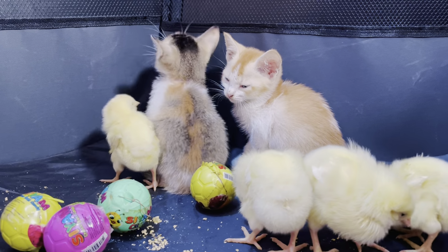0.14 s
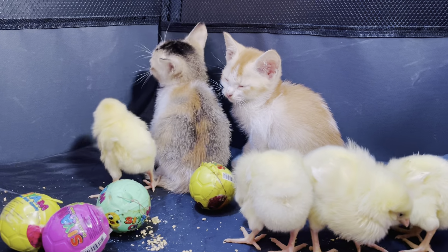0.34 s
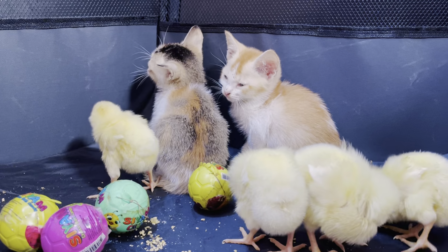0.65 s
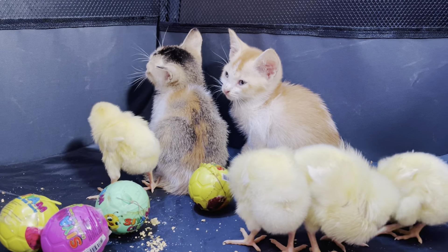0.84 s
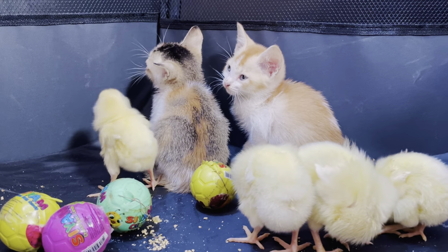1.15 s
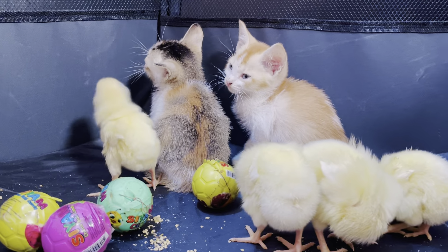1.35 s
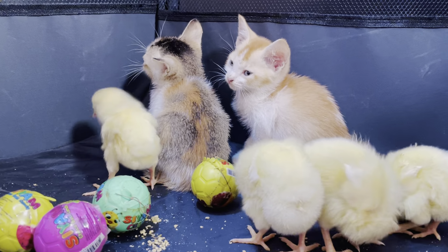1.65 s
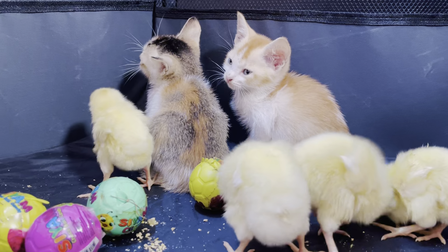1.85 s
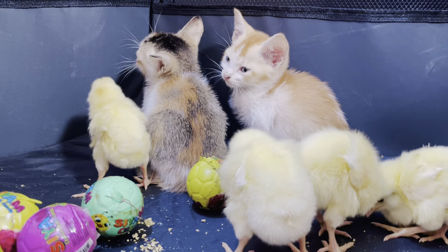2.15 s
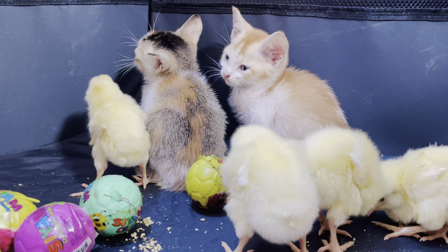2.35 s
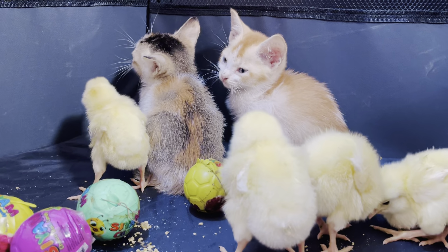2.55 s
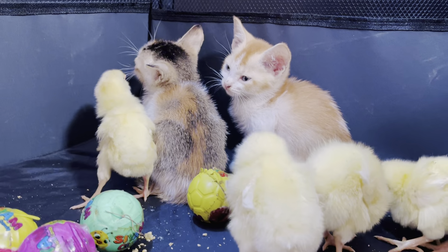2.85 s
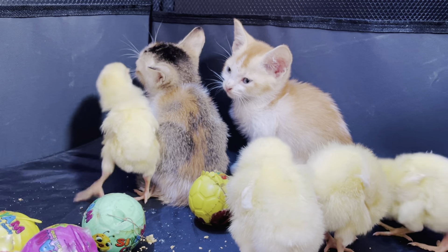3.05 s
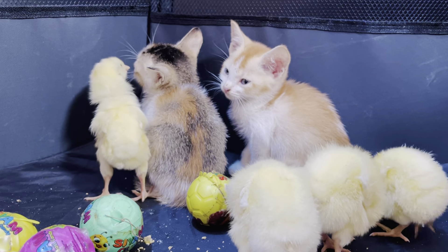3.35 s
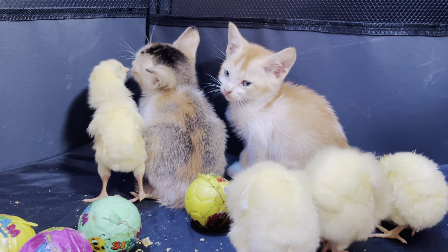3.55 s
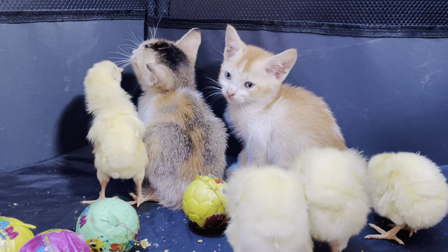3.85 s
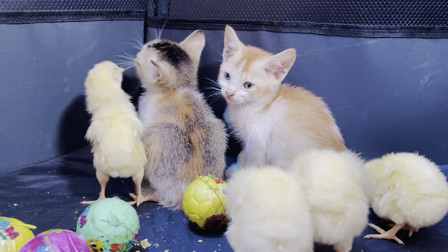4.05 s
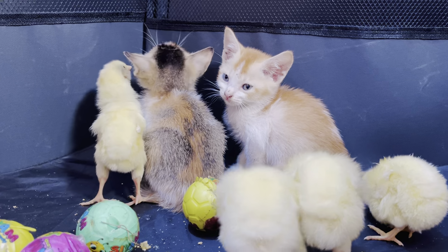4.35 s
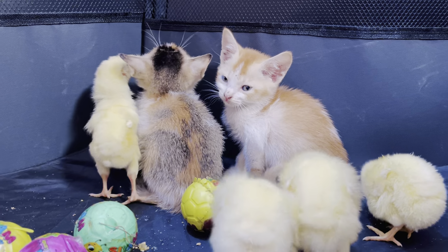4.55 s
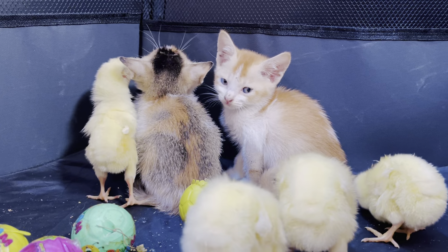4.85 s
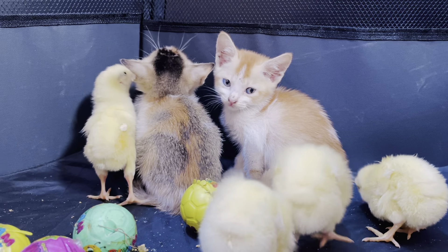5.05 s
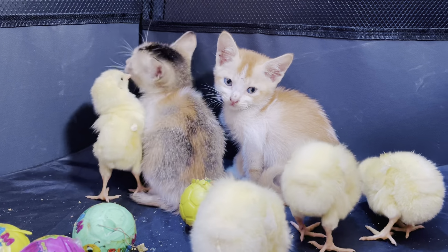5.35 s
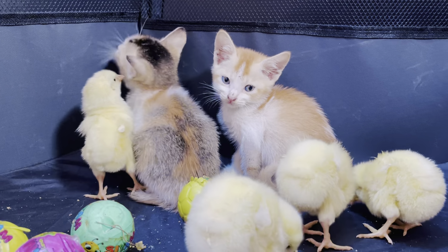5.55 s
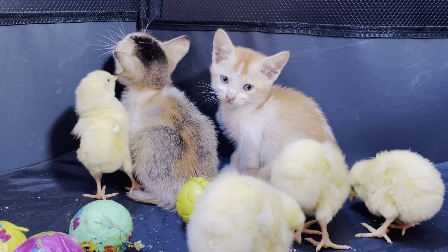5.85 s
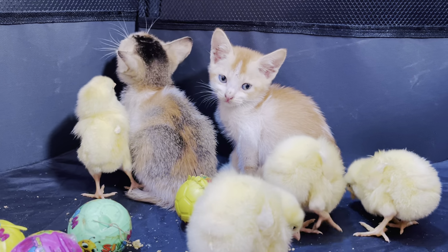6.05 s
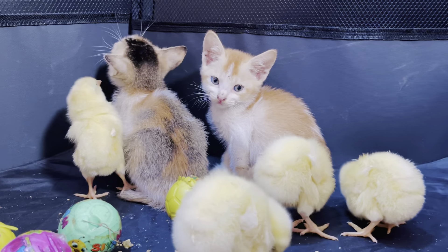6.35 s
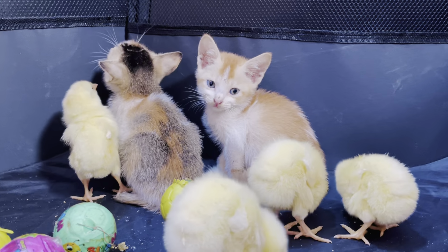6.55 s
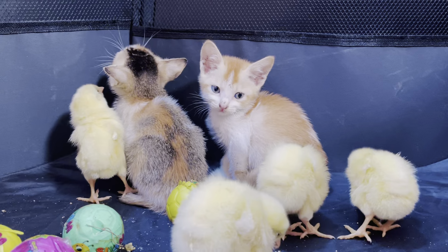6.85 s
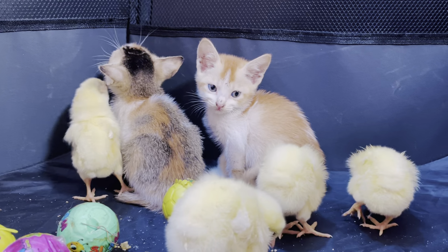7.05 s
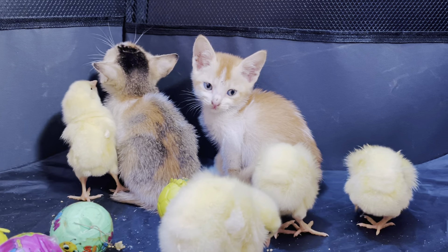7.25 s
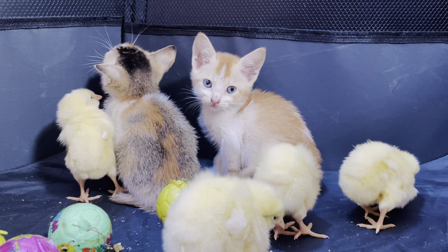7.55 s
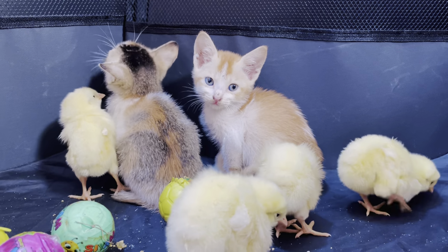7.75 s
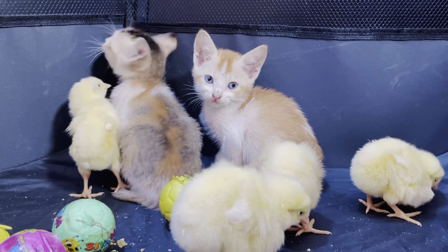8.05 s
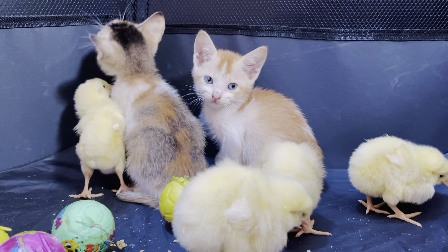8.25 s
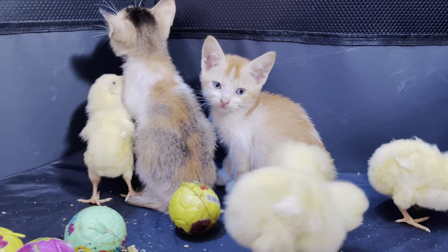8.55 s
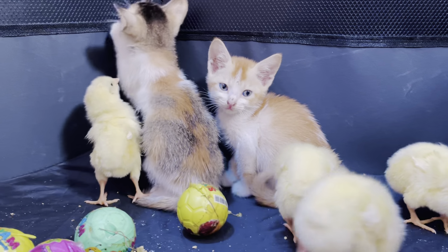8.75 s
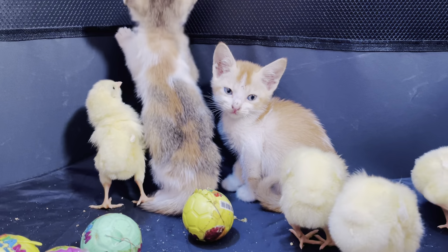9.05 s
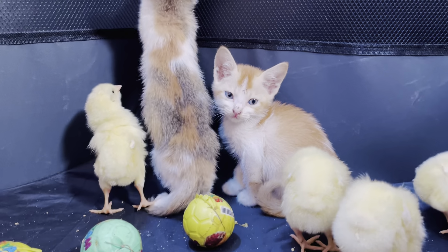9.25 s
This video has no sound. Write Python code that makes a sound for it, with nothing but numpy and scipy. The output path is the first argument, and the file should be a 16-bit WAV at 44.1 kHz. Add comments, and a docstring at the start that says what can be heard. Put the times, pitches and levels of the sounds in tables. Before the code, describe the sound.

Bright chick peeps start at once over scratchy fidgeting, with a low thump of the pen floor early on. The peeping pauses around a clear kitten meow, resumes, then stops for a second, hoarser meow. A third, shorter meow comes among later peeps, followed by louder cheeps and busier claw taps. Close stereo pickup in a small room, brief echo, faint hiss.

```python
"""Chicks and a kitten in a fabric pen

Chicks peep almost throughout in a pet pen in a small room, close to the microphones; a kitten meows three times.
Each peep is a quick arch of a nearly pure whistle; softer trills come from chicks further off.
Each meow is a stack of harmonics that opens hoarse, rings out through the mouth and closes to a thin hum.
Shaped noise makes claws tick, fabric rustle and thud, and air hiss; sparse echoes let the room ring briefly."""
import sys
import numpy as np
from scipy import signal
from scipy.fft import rfft, irfft, next_fast_len
from scipy.io import wavfile
from scipy.ndimage import uniform_filter1d, map_coordinates

SR = 44100
rng = np.random.default_rng(int(sys.argv[2]) if len(sys.argv) > 2 else 0)


def int16_out(signal):
    """Quantize to a 16-bit WAV file."""
    q = np.round(np.clip(np.atleast_2d(signal).T, -1, 1) * 32767)
    wavfile.write(sys.argv[1], SR, q.astype(np.int16))


N = 414981


def gain_of(db):
    """Decibels to amplitude."""
    return 10 ** (np.asarray(db) / 20)


def evened(x):
    """Scales to rms 1."""
    return x / np.sqrt(np.mean(x ** 2) + 1e-20)


def read(points, hz):
    """Reads a curve over frequency, interpolating on a log-frequency axis."""
    f, value = np.transpose(points)
    return np.interp(np.log(hz + 1), np.log(f + 1), value)


def add(mix, start_s, sound):
    """Mixes a sound in at its start, cutting off whatever runs past the end."""
    part = mix[..., max(round(start_s * SR), 0):][..., :sound.shape[-1]]
    part += sound[..., :part.shape[-1]]


def coloured(x, colour):
    """Filters x by a colour in dB over Hz and evens it to rms 1."""
    size = next_fast_len(len(x))
    gain = gain_of(read(colour, np.fft.rfftfreq(size, 1 / SR)))
    return evened(irfft(rfft(x, size) * gain, size)[:len(x)])


def wander(size, hz):
    """Smooth random drift around zero, with hz random points a second."""
    points = rng.standard_normal(4096)
    return map_coordinates(points, [np.arange(size) * hz / SR], order=3, mode="wrap")


def bump(t, at, width):
    """A smooth hump of height 1."""
    return np.exp(-((t - at) / width) ** 2)


def placed(x, left_db):
    """Spreads a sound over two channels, the left one louder by left_db."""
    return x * gain_of([[left_db / 2], [-left_db / 2]])


def movements(rows, fidget_db, rise):
    """Gain over time: each movement swells up (rise = share of its length) and dies away, over fidgeting."""
    # constant fidgeting of the animals, which calms down and picks up again near the end:
    # time_s, level_db (relative to fidget_db)
    fidget = [(0, 1.5), (4, -2.5), (5.5, -8), (7.4, -15), (9.4, -4.5)]
    time = np.arange(N) / SR
    power = gain_of(fidget_db + np.interp(time, *np.transpose(fidget))) ** 2
    for peak_s, length_s, level_db in rows:
        away = np.maximum(time - peak_s, (peak_s - time) / rise) / length_s
        power += gain_of(level_db) ** 2 * np.exp(-np.minimum(2 * away, 20))
    return np.sqrt(power)


def shuffle(rub_db=1.5, scratch_db=-2, grains_per_s=900, grain_db=0.0, clump_db=6.5, lump_db=9.0,
            smooth=0.079):
    """Soft lumpy noise of rubbed fabric, with clumps of tiny crackles where claws catch the weave."""
    # feet and fur rubbing over the fabric: peak_s, length_s (fall to 1/e), level_db (before rub_db)
    rubs = [(.16, 0.18, -69), (.52, 0.039, -67.5), (.68, 0.095, -60.5), (1.25, .2, -66), (1.64, .13, -53),
            (2.05, 0.029, -62), (2.36, 0.093, -63.5), (2.9, 0.073, -59.5), (3.62, 0.096, -60.5),
            (4.12, 0.054, -68.5), (4.36, 0.026, -58.5), (4.66, .15, -69.5), (5.12, 0.046, -66),
            (5.35, 0.024, -63), (6.38, 0.13, -62.5), (6.6, 0.17, -65), (8.23, 0.15, -62.5),
            (8.7, 0.29, -78)]
    # claws catching the weave: peak_s, length_s (fall to 1/e), level_db (before scratch_db)
    scratches = [(.04, 0.017, -49), (.28, 0.04, -55), (.62, .12, -60), (.87, 0.077, -61.5),
                 (1.55, 0.29, -66), (1.82, 0.085, -53), (2.0, 0.03, -46.5), (2.87, 0.055, -73),
                 (3.15, .2, -64.5), (4.56, 0.033, -54), (5.08, 0.11, -62), (6.25, .15, -58.5),
                 (6.7, .2, -71), (7.55, .03, -72), (8.1, .25, -60.5), (8.75, 0.16, -66)]
    # tone of the rubbed fabric: frequency_hz, relative_db
    rub_colour = [(60, -15), (170, 3.5), (400, -0.5), (900, -5.5), (1500, -9.5), (2200, -15), (4000, -9),
                  (7000, -31), (11000, -40)]
    # tone of the caught weave: frequency_hz, relative_db
    scratch_colour = [(2000, -15), (5000, -20.5), (7500, -4.5), (10000, 0.5), (12000, -3), (13500, -7.5),
                      (16000, -20.5)]
    lumps = evened(gain_of(lump_db * np.tanh(wander(N, 45))))
    rubbing = coloured(rng.standard_normal(N), rub_colour) * lumps
    grains = (rng.random(N) < grains_per_s / SR) * rng.standard_normal(N)
    grains = grains * gain_of(grain_db * np.minimum(rng.exponential(1, N), 4))
    clumps = gain_of(clump_db * wander(N, 50))
    crackle = coloured((grains + smooth * rng.standard_normal(N)) * clumps, scratch_colour)
    rubbing = rubbing * movements(rubs, fidget_db=-74.5, rise=1.0)
    crackle = crackle * movements(scratches, fidget_db=-77, rise=0.9)
    return gain_of(rub_db) * rubbing + gain_of(scratch_db) * crackle


def thuds(lump_db=4.0):
    """The floor and walls of the pen flex with a low, lumpy rumble."""
    # the pen flexing under the animals: peak_s, length_s (fall to 1/e), level_db
    flexes = [(.18, .08, -78), (.5, 0.038, -57), (1.66, 0.062, -44), (2.35, 0.045, -54.5),
              (2.87, 0.11, -55), (3.09, .025, -52), (3.65, 0.11, -63), (6.17, .06, -50), (6.6, .18, -61.5),
              (8.52, 0.078, -60.5), (9.26, 0.13, -57.5)]
    # tone of the flexing pen: frequency_hz, relative_db
    thud_colour = [(15, -15), (35, -9.5), (62, 7.5), (120, -4), (200, -17.5), (400, -40)]
    lumps = evened(gain_of(lump_db * np.tanh(wander(N, 22))))
    rumble = coloured(rng.standard_normal(N), thud_colour) * lumps
    return rumble * movements(flexes, fidget_db=-67, rise=.6)


def air(level_db=-68.5, apart=0.5):
    """Faint steady hiss of the room and the microphone: noise mostly shared by both ports."""
    # tone of the hiss: frequency_hz, relative_db (per Hz)
    air_colour = [(20, -17), (250, -6.5), (700, -17.5), (1200, -5.5), (1430, 3.5), (1800, -22.5),
                  (2700, -16.5), (3500, -9), (5000, -11.5), (7600, -32), (9000, 1), (10100, -11.5),
                  (10900, -14), (12800, -21.5), (15500, -36.5)]
    shared, left, right = (coloured(rng.standard_normal(N), air_colour) for _ in range(3))
    return gain_of(level_db) * placed(shared + apart * np.array([left, right]), left_db=3)


def whistle(hz, level_db, overtone_db, quiver, quiver_hz, attack, flutter_db=2.5, third_db=-7,
            release=0.0033):
    """A chick's nearly pure tone with faint overtones, quivering in pitch and level."""
    size = len(hz)
    t = np.arange(size) / SR
    angle = 2 * np.pi * np.cumsum(hz * (1 + quiver * wander(size, quiver_hz))) / SR
    edges = np.clip(np.minimum(t / attack, (t[-1] - t) / release), 0, 1)
    gate = np.sin(np.pi / 2 * edges) ** 2
    overtones = np.sin(2 * angle) + gain_of(third_db) * np.sin(3 * angle)
    tone = np.sin(angle) + gain_of(overtone_db) * overtones
    return np.sqrt(2) * tone * gate * gain_of(level_db + flutter_db * wander(size, 103.5))


def peep(row):
    """A whistle that scoops up to its crest, holds and drops, swelling in the middle."""
    # high, thin peeps carry more overtone than low ones: pitch_hz, overtone_db (relative to the fundamental)
    overtone = [(3400, -28), (4600, -29.5), (4950, -25.5), (5250, -11.5)]
    scoop, scoop_s = .2, 0.016  # share of the pitch it starts under its top; less for a rise near scoop_s
    rise_bend, fall_bend = 2.6, 2.8  # the later the crest, the longer the pitch holds before a steep drop
    ceiling_hz, ceiling_bend = 5095, 1.1  # above this pitch the arch flattens: extra bend per 100 Hz
    lowest_hz = 2850  # the drop aims no lower
    warble_share, warble_hz, warble_from_s = .011, 60.34, 0.11  # only longer peeps waver in pitch
    swell_db, loudest = 5, 0.61  # loss half a length away from the loudest point; its place (0-1)
    beak_hz, beak_db = 4100, 12  # the beak carries this pitch best; loss per squared octave away

    start_s, length_s, top_hz, crest, drop, level_db, left_db = row
    stage, crest = np.linspace(0, 1, int(length_s * SR)), np.clip(crest, .02, .95)
    flat = ceiling_bend * max(top_hz - ceiling_hz, 0) / 100
    depth = scoop * (1 - np.exp(-crest * length_s / scoop_s))
    rise = depth * np.clip(1 - stage / crest, 0, 1) ** (rise_bend + flat)
    fall = np.clip((stage - crest) / (1 - crest), 0, 1) ** (1 + fall_bend * crest + flat)
    fall = min(drop, 1 - lowest_hz / top_hz) * fall
    drawn_out = np.clip(2 * (length_s / warble_from_s - 1), 0, 1)
    warble = warble_share * drawn_out * wander(len(stage), warble_hz)
    hz = top_hz * (1 - rise - fall + warble)
    level_db = level_db - swell_db * (2 * (stage - loudest)) ** 2
    level_db = level_db - beak_db * np.log2(hz / beak_hz) ** 2
    tone = whistle(hz, level_db, read(overtone, hz), quiver=0.007, quiver_hz=89.8, attack=0.0067)
    return start_s, placed(tone, left_db)


def claws(tick_db=-3, knock_db=-4, tick_decay=0.0037, knock_decay=0.023, scrape=0.22,
          scrape_decay=0.049, brush=.12, brush_rise=.008):
    """A foot brushes the floor, lands with a tick and a dull knock, and scrapes on."""
    # claws, beaks and feet on the floor: contact_s, level_db (before tick_db and knock_db),
    # body_db (extra level of the knock)
    ticks = [(0.1376, -50.5, 3.5), (0.496, -61, 13), (0.5669, -46, 0.5), (1.6153, -61, 12),
             (1.7886, -39.5, -25), (1.831, -70, -13), (1.8582, -46, -35), (2.2993, -68, 12.5),
             (3.0084, -52.5, 1.5), (3.4563, -50.5, -19), (4.4554, -47, -4.5), (4.5251, -46, -28),
             (4.9312, -48.5, -11.5), (5.045, -65, -14.5), (5.2656, -49, 0), (6.564, -76, 4),
             (7.302, -51.5, -36), (7.3906, -46, -14), (8.4227, -45, -5.5), (8.5596, -47, -14),
             (8.6762, -40.5, -24), (8.737, -48, -17), (8.8514, -47.5, -17), (9.3228, -47, -10)]
    # tone of the tick: frequency_hz, relative_db
    tick_colour = [(1500, -19), (3000, -8.5), (6000, -14.5), (9000, -6), (12000, -4.5), (14000, -12),
                   (16000, -17)]
    # tone of the knock: frequency_hz, relative_db
    knock_colour = [(50, -17.5), (160, -15.5), (500, -6.5), (1300, -6), (3000, -19.5), (6000, -30)]
    out, t = np.zeros(N), np.arange(-1024, 4096) / SR  # contact at t = 0
    brushing = brush * np.exp(-abs(t) / brush_rise)
    landing = np.exp(-abs(t) / tick_decay) + scrape * np.exp(-abs(t) / scrape_decay)
    contact = np.where(t < 0, brushing, landing)
    thump = np.exp(-abs(t) / knock_decay) * np.clip(t / 0.0017, 0, 1)
    for contact_s, level_db, body_db in ticks:
        tick = coloured(rng.standard_normal(len(t)), tick_colour) * contact
        knock = coloured(rng.standard_normal(len(t)), knock_colour) * thump
        step = gain_of(tick_db) * tick + gain_of(knock_db + body_db) * knock
        add(out, contact_s + t[0], gain_of(level_db) * step)
    return out


def trill(row, droop=0.055):
    """A chick further off: a shallow, strongly warbled arch of whistle."""
    start_s, length_s, pitch_hz, level_db = row
    arch = 1 - droop * np.linspace(-1, 1, int(length_s * SR)) ** 4
    tone = whistle(pitch_hz * arch, level_db, overtone_db=-16, quiver=0.0253, quiver_hz=163, attack=0.0049)
    return start_s, tone


def meow(row, width_hz=420, skirt=1.27, jitter=0.026, jitter_hz=420, shimmer=.5, rasp=1.0, rasp_hz=450,
         waver=0.006, uneven_db=4.5, hoarse_db=-22, airy_db=-58):
    """Vocal-fold harmonics pass a mouth resonance that moves with the jaw, from hoarse push to frayed end."""
    # treble of the wide open mouth: frequency_hz, relative_db
    meow_treble = [(4500, -31.5), (6200, -6), (7200, -4), (8000, -1.5), (9300, -10.5), (11000, -14.5),
                   (12800, -11), (14200, -17.5), (15000, -48)]
    # hoarse noise between the harmonics: frequency_hz, relative_db
    hoarse = [(80, -14), (250, -8), (650, -4), (1500, 0.5), (3000, 5.5), (5000, -0.5), (7000, -9.5),
              (9000, -27), (14000, -19)]
    # a soft voice keeps only its low harmonics clear: mouth_db, clear_hz (above it they turn to noise)
    clear_up_to = [(-67, 4100), (-44.5, 2800), (-31, 29000)]
    push_s, push_width_s, push_db = 0.064, 0.048, 8.5  # hoarse push at the start lifts the fundamental
    open_s, open_width_s, open_db = 0.3, 0.16, 15  # the open mouth thins the fundamental
    lips_s, lips_width_s = 0.026, 0.045  # the parting lips briefly lift the octave
    octave_follows, full_cry_db = 0.43, -16  # share of the cry's dB changes; cry at the listed octave level
    third_db = -14.5  # third harmonic relative to the octave
    treble_db_per_octave, wide_hz = 10, 4690  # treble dulls as the resonance sinks below wide_hz
    clear_rough, fray_s, shut_s = .1, 0.18, 0.076  # mid-call roughness; fray and mouth closing at the end

    curve, hum_db, full_octave_db, lips_db, bright_db, start_rough, end_rough = row
    s, *columns = np.transpose(curve)
    t = np.arange(s[0] - .006, s[-1] + .008, 1 / SR)
    hz, mouth_db, mouth_hz = (uniform_filter1d(np.interp(t, s, c), size=500, mode="nearest")
                              for c in columns)
    age, remaining, size = t - t[0], t[-1] - t, len(t)

    push = bump(age, push_s, push_width_s)
    fray = end_rough * bump(remaining, 0, fray_s)
    opened = bump(age, open_s, open_width_s) * (1 - bump(remaining, 0, shut_s))
    rough = np.clip(clear_rough + start_rough * push + fray, 0, 1)
    first_db = hum_db + push_db * push - open_db * opened
    octave_db = full_octave_db + octave_follows * (mouth_db - full_cry_db)
    octave_db = octave_db + lips_db * bump(age, lips_s, lips_width_s)
    treble_db = mouth_db + bright_db + treble_db_per_octave * np.log2(mouth_hz / wide_hz)

    hz = hz * (1 + jitter * np.minimum(rough, .5) * wander(size, jitter_hz) + waver * wander(size, 60.65))
    angle = 2 * np.pi * np.cumsum(hz) / SR
    order = np.arange(1, 23)[:, None]
    # the two lowest harmonics pass even a closed mouth; the rest share the resonance and the treble
    mouth = (order > 2) * (1 + ((order * hz - mouth_hz) / width_hz) ** 2) ** (-skirt / 2)
    mouth = mouth / (1 + (order * hz / 7500) ** 8)
    treble = gain_of(read(meow_treble, order * hz))
    resonant = gain_of(mouth_db) * mouth / np.linalg.norm(mouth, axis=0)
    bright = gain_of(treble_db) * treble / np.linalg.norm(treble, axis=0)
    height = np.hypot(resonant, bright)
    height[:2] = gain_of([first_db, octave_db])
    height[2] = np.hypot(height[2], gain_of(octave_db + third_db))

    voice, clear_hz = np.zeros(size), np.interp(mouth_db, *np.transpose(clear_up_to))
    for k, partial in enumerate(height, 1):
        # higher harmonics turn to noise first
        smear = np.clip(rasp * rough * (k / 4) ** 1.3 + (k * hz / clear_hz) ** 3, 0, 1)
        noise = (wander(size, rasp_hz) + 1j * wander(size, rasp_hz)) / np.sqrt(2)
        swell = gain_of(uneven_db * min(k / 8, 1) * wander(size, 35))
        carrier = np.exp(1j * (k * angle + 2 * np.pi * rng.random()))
        voice += swell * partial * ((np.sqrt(1 - smear ** 2) + smear * noise) * carrier).real
    voice *= 1 + shimmer * np.minimum(rough, .5) * wander(size, 250)
    breath = gain_of(hoarse_db + mouth_db) * (0.32 + 2 * rough) + gain_of(airy_db) * fray
    voice += coloured(rng.standard_normal(size), hoarse) * breath
    return s[0], np.sqrt(2) * voice * np.clip(np.minimum(age / 0.022, remaining / 0.0067), 0, 1)


def room(x, early_decay=.007):
    """Two echoes of x: quick reflections from the pen, and the short tail of the room."""
    # time for the tail to fall by 60 dB: frequency_hz, decay_s
    room_t60 = [(200, 0.09), (1000, 0.48), (4500, 0.34), (8000, 0.072), (14000, 0.036)]
    t = np.arange(SR // 2) / SR
    # sparse echoes of random sign, different at each port
    taps = rng.standard_normal((2, len(t))) * (rng.random((2, len(t))) < .1) * (t > .006)
    hz, frames, z = signal.stft(taps, SR, nperseg=256)
    decay = gain_of(-60 * frames / read(room_t60, hz)[:, None])
    tail = signal.istft(z * decay, SR, nperseg=256)[1][:, :len(t)]
    early = rng.standard_normal((2, len(t))) * (rng.random((2, len(t))) < .04)
    early = early * (t > .001) * np.exp(-t / early_decay)
    return [signal.fftconvolve(x, h / np.linalg.norm(h, axis=1, keepdims=True), axes=1)[:, :N]
            for h in (early, tail)]


def scene(chicks_db=3, kitten_db=-1, trills_db=-4, early_db=-11, tail_db=-14, far_direct_db=-6,
          feet_echo_db=4):
    """Chicks, kitten and feet in the pen, mostly a little to the left; the far chicks are mostly echo."""
    # near chicks: start_s, length_s, top_hz, crest (place 0-1), drop (share of the pitch),
    # level_db (before chicks_db and the peep's shaping), left_db (left over right)
    peeps = [(0.088, 0.11, 5330, 0.45, 0.11, -44, 2.5), (0.14, 0.041, 3516, 0.15, 0.13, -45.5, 5),
             (0.321, 0.05, 3630, 0.36, 0.17, -49.5, 1), (0.705, 0.24, 5166, 0.59, 0.023, -48.5, 4.5),
             (0.826, 0.049, 3412, 0.25, 0.12, -45.5, 6.5), (0.999, 0.11, 5407, 0.39, 0.16, -45, 6.5),
             (1.014, 0.063, 3440, 0.35, 0.094, -57, 10.5), (1.121, 0.062, 4670, 0.35, 0.21, -47.5, 4),
             (1.536, 0.054, 3763, 0.02, 0.045, -44, 4), (1.629, 0.23, 4740, 0.47, 0.042, -49.5, 5),
             (1.902, 0.12, 4446, 0.27, 0.17, -48.5, 3.0), (1.907, 0.13, 5300, 0.45, 0.11, -47.5, -2.5),
             (2.055, 0.048, 3504, 0.25, 0.13, -48.5, 3), (2.115, 0.1, 5430, 0.46, 0.36, -48, -3),
             (2.205, 0.052, 3575, 0.25, 0.09, -46.5, -0.5), (2.34, 0.085, 4230, 0.18, 0.26, -50, 4.0),
             (2.48, 0.055, 3864, 0.14, 0.12, -48.5, 1.5), (2.485, 0.055, 4540, 0.08, 0.14, -57, 2),
             (2.644, 0.14, 4563, 0.12, 0.23, -42, 6), (2.932, 0.27, 4005, 0.15, 0.095, -50, 0),
             (2.963, 0.15, 5005, 0.62, 0.17, -55, 4), (3.186, 0.13, 4930, 0.4, 0.37, -46.5, 5.5),
             (3.198, 0.096, 5253, 0, 0.07, -50.5, 6), (3.385, 0.12, 5033, 0.47, 0.42, -42.5, 5.5),
             (4.045, 0.16, 4086, 0.34, 0.15, -50.5, 3.5), (4.107, 0.095, 4564, 0.46, 0.041, -53, 5),
             (4.284, 0.079, 4430, 0.38, 0.25, -45, 4.5), (4.46, 0.06, 4230, 0.45, 0.29, -42.5, 4),
             (4.625, 0.047, 3620, 0.34, 0.12, -53.5, -1.5), (4.936, 0.16, 4215, 0.81, 0.23, -43.5, 3.0),
             (5.151, 0.059, 4860, 0.46, 0.46, -42.0, 4.5), (5.269, 0.033, 4450, 0.69, 0.56, -40, 5.0),
             (5.278, 0.11, 5260, 0.44, 0.16, -51.5, 4), (6.539, 0.049, 3520.0, 0.15, 0.16, -50, -1),
             (6.682, 0.164, 4075, 0.07, 0.054, -52, 6.5), (6.915, 0.11, 5154, 0.31, 0.31, -46, 2),
             (6.916, 0.033, 3290, 0.13, 0.13, -53, 2), (7.043, 0.06, 3620, 0.37, 0.12, -46.5, 4.5),
             (7.185, 0.078, 4160, 0.44, 0.19, -47, 5.5), (7.33, 0.077, 4590, 0.3, 0.29, -45.5, 3.0),
             (7.618, 0.072, 4640, 0.28, 0.16, -45.5, 6.5), (7.659, 0.1, 4055, 0, 0.11, -42.5, 8.5),
             (7.986, 0.075, 4160, 0.53, 0.11, -50, -1.0), (8.112, 0.12, 4680, 0.36, 0.35, -45, 5.5),
             (8.289, 0.097, 4930, 0.44, 0.44, -44, 5), (8.631, 0.12, 4120, 0.05, 0.14, -55, 10.5),
             (8.687, 0.055, 3560, 0.15, 0.1, -50.5, 10), (8.744, 0.16, 4630, 0.42, 0.28, -40.5, 4.5),
             (8.862, 0.095, 4350, 0.55, 0.23, -45, 4.0), (8.946, 0.102, 4740, 0.45, 0.36, -40, 3.5),
             (9.056, 0.123, 5095, 0.32, 0.3, -49, 8.5), (9.102, 0.07, 4810, 0.41, 0.39, -39.5, 4.5),
             (9.282, 0.043, 4440.0, 0.29, 0.079, -48.0, 4)]
    # chicks further off: start_s, length_s, pitch_hz, level_db (before trills_db and far_direct_db)
    trills = [(0.465, 0.057, 4270, -64.5), (1.409, 0.16, 4670, -65), (2.68, 0.021, 5030, -65),
              (2.924, 0.25, 4810, -57.5), (4.217, 0.1, 4800, -64), (4.306, 0.063, 5080, -51),
              (4.444, 0.14, 4890, -61), (5.021, 0.091, 4720, -53.5), (5.219, 0.092, 4960, -64),
              (5.394, 0.067, 5050, -55), (6.613, 0.068, 4830, -54), (6.674, 0.1, 4355, -55.5)]
    # one curve a meow: time_s, pitch_hz, mouth_db (strength of the cry, before kitten_db),
    # mouth_hz (resonance)
    MEOW_1 = [(3.538, 543, -61.5, 3960), (3.57, 498.5, -59.5, 3860), (3.6, 635, -33, 3940),
              (3.635, 763, -20, 4920), (3.668, 812.6, -17.5, 5000), (3.735, 800.6, -32.5, 4840),
              (3.78, 763, -40.5, 3330), (3.89, 869, -66.5, 2900), (3.98, 768, -74, 2893),
              (4.12, 500, -83.5, 3000)]
    MEOW_2 = [(5.475, 606, -63, 4400), (5.506, 656, -43, 4280), (5.556, 829.5, -24, 5050),
              (5.608, 884, -27.5, 4530), (5.694, 850.4, -31, 3120), (5.757, 899, -41, 2550),
              (5.81, 937, -53.5, 2880), (5.87, 869, -53, 2820), (5.928, 953, -67.5, 2750),
              (6.131, 876, -66.5, 2950), (6.238, 759, -64.5, 3000), (6.275, 561.3, -58, 3000),
              (6.325, 741, -75, 3000)]
    MEOW_3 = [(7.731, 594, -80, 3000), (7.774, 569, -50.5, 2800), (7.809, 724, -33.5, 2870),
              (7.858, 813, -30, 3660), (7.914, 948, -30.5, 3670), (7.948, 884, -33, 3200),
              (7.985, 907, -33.5, 2580), (8.01, 915, -52, 2700), (8.056, 884, -52, 3160),
              (8.07, 672, -55, 3166)]
    # the meows: curve, hum_db (fundamental), full_octave_db (octave at full cry),
    # lips_db (lift of the octave at the start), bright_db (treble relative to the cry),
    # start_rough (0-1), end_rough (0-1); levels before kitten_db
    meows = [(MEOW_1, -43, -30.5, 8.5, -13, 0.37, 0.16), (MEOW_2, -45.5, -32.5, 4.5, -8, 0.77, 0.97),
             (MEOW_3, -44, -32.5, 16.5, -15, 0.35, 0.4)]
    chicks, kitten, far = np.zeros((2, N)), np.zeros(N), np.zeros((2, N))
    for row in peeps:
        add(chicks, *peep(row))
    for row in trills:
        add(far, *trill(row))
    for row in meows:
        add(kitten, *meow(row))
    voices = gain_of(chicks_db) * chicks + gain_of(kitten_db) * placed(kitten, left_db=5.5)
    feet = placed(claws() + shuffle() + thuds(), left_db=3.0)
    early, tail = room(voices + gain_of(feet_echo_db) * feet)
    far = gain_of(trills_db) * (gain_of(far_direct_db) * far + sum(room(far)))
    return voices + feet + gain_of(early_db) * early + gain_of(tail_db) * tail + far + air()


def record(dry, merge_hz=7600, edge_hz=15800):
    """Two microphone ports with a phase offset; their treble merges into one signal; then the band limit."""
    # phase by which the left port leads: frequency_hz, phase_rad
    port_phase = [(400, 0.5), (700, -1.78), (1400, -1.7), (2000, 0.57), (3200, 1.38), (5000, 0.5),
                  (6200, 0.3), (7600, -2.5), (8600, -3), (10000, -4.5), (13300, -6)]
    hz = np.fft.rfftfreq(N, 1 / SR)
    left, right = rfft(dry)
    merged = 1 / (1 + (merge_hz / (hz + 1)) ** 20)
    ports = np.array([left, right]) * (1 - merged) + merged * (left + right) / 2
    ports[1] *= np.exp(-1j * read(port_phase, hz))
    low_pass = signal.firwin(511, edge_hz, window=("kaiser", 9), fs=SR)
    return signal.oaconvolve(irfft(ports, N), low_pass[None], "same")


dry = scene()
out = record(dry)
int16_out(out)
```